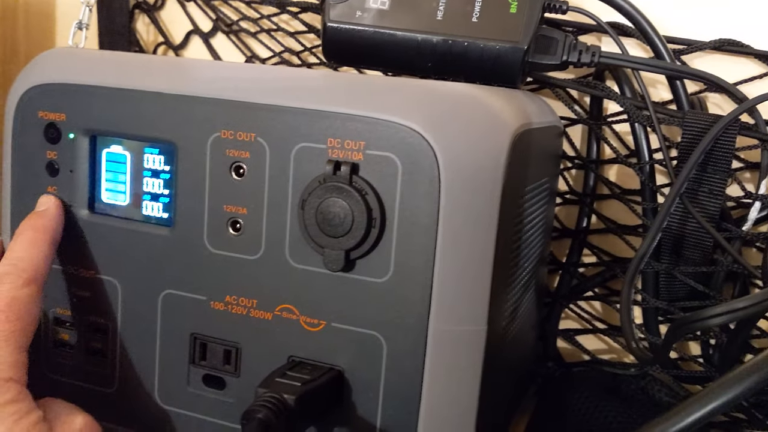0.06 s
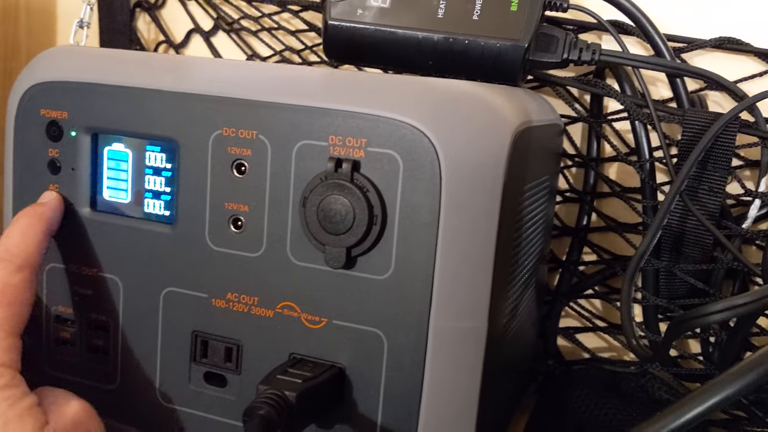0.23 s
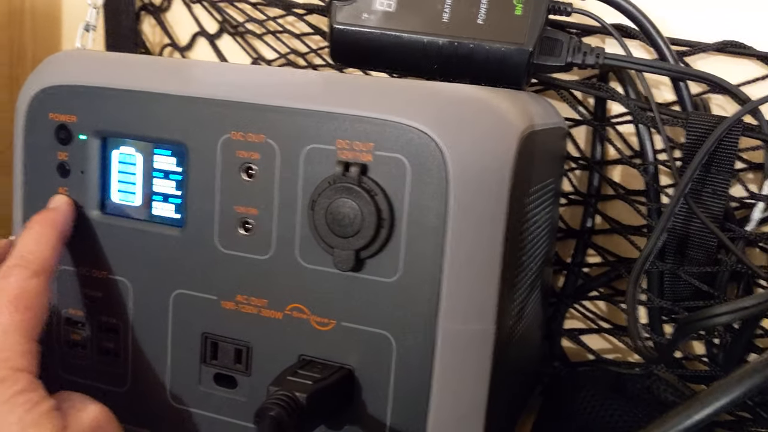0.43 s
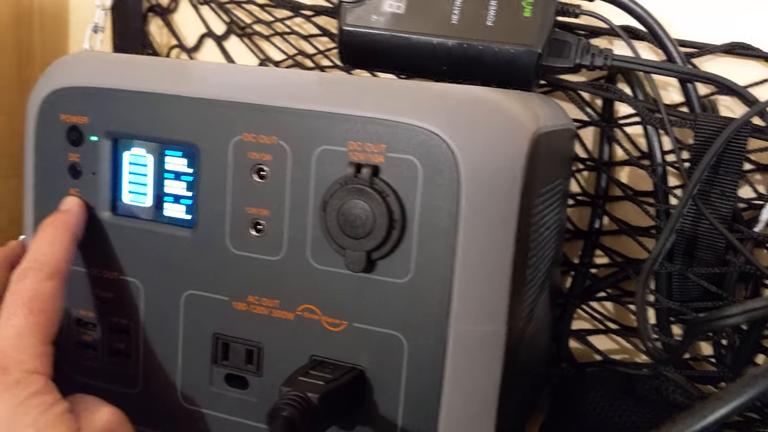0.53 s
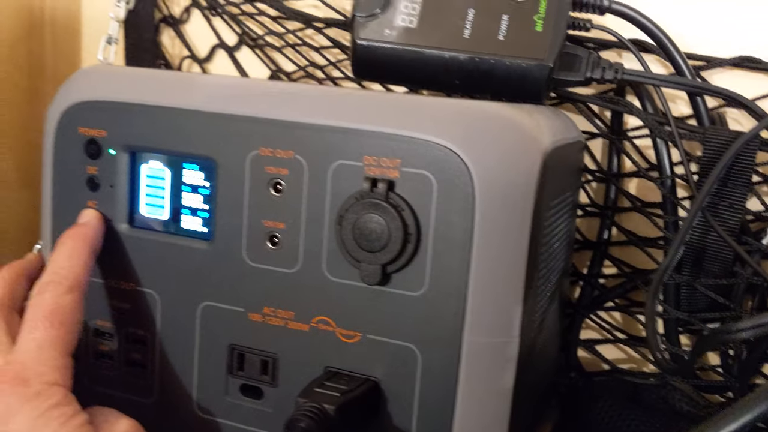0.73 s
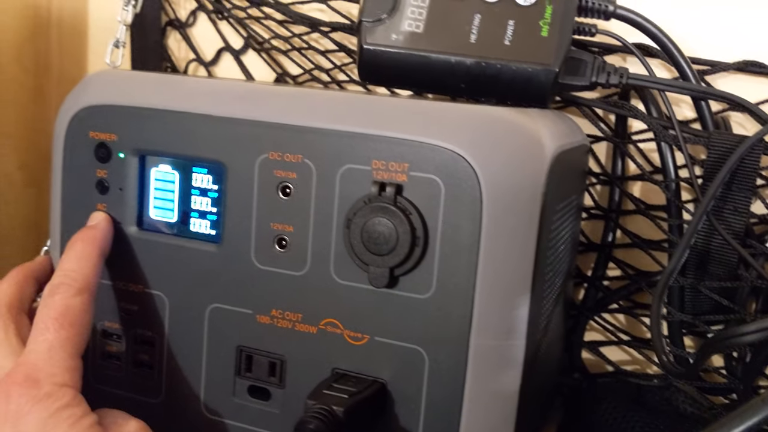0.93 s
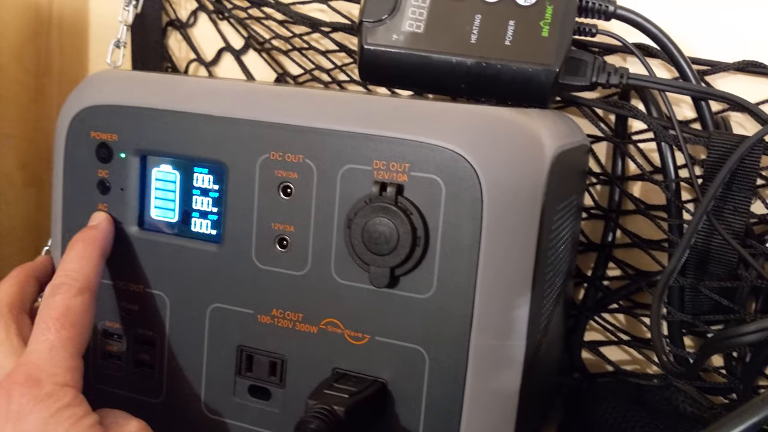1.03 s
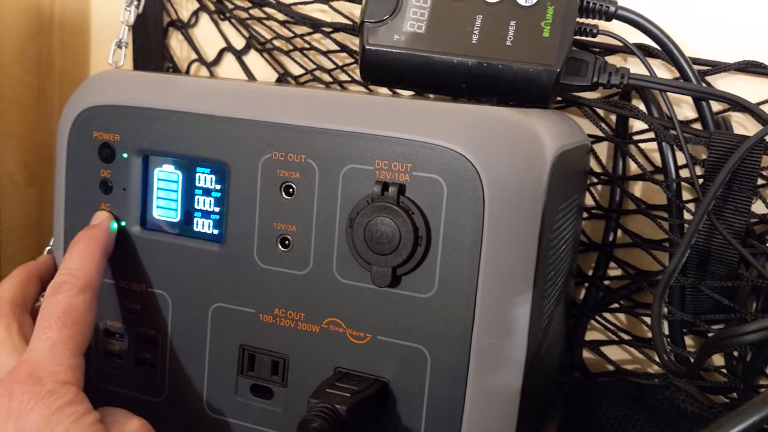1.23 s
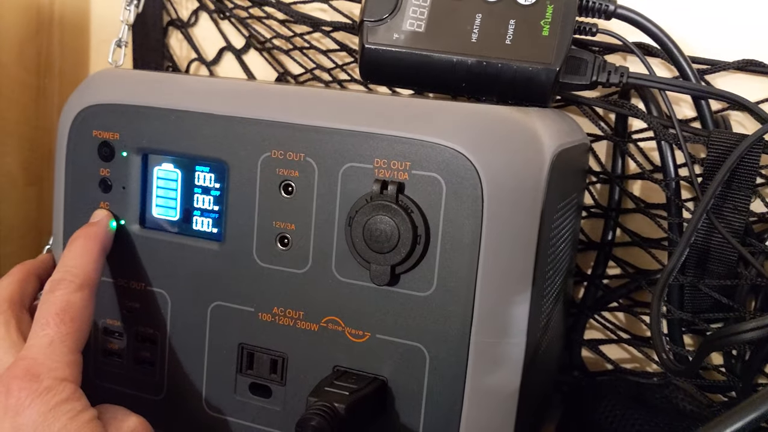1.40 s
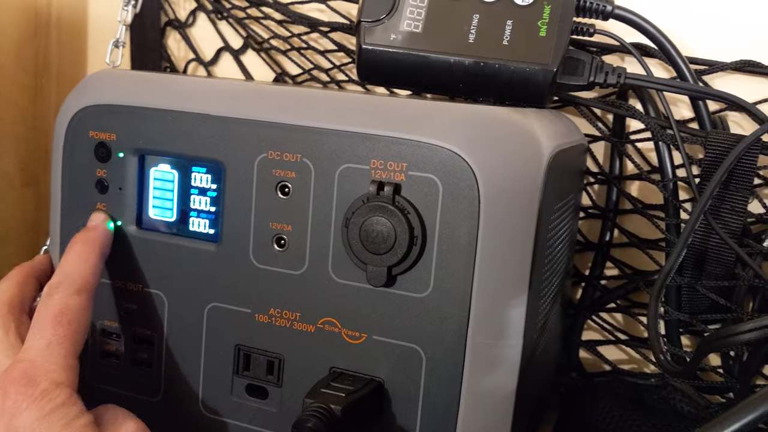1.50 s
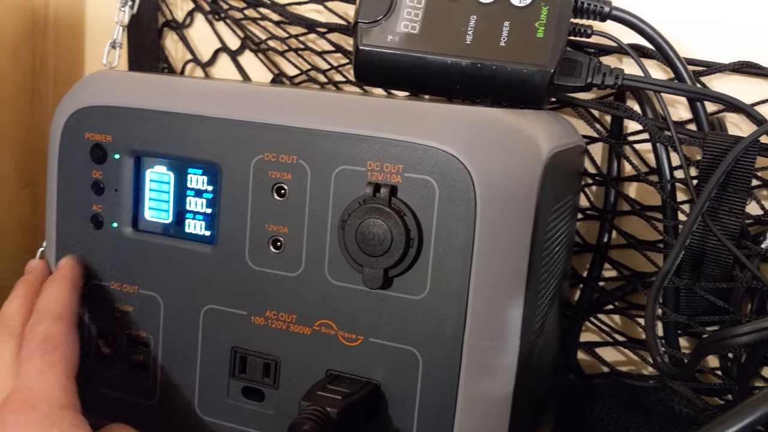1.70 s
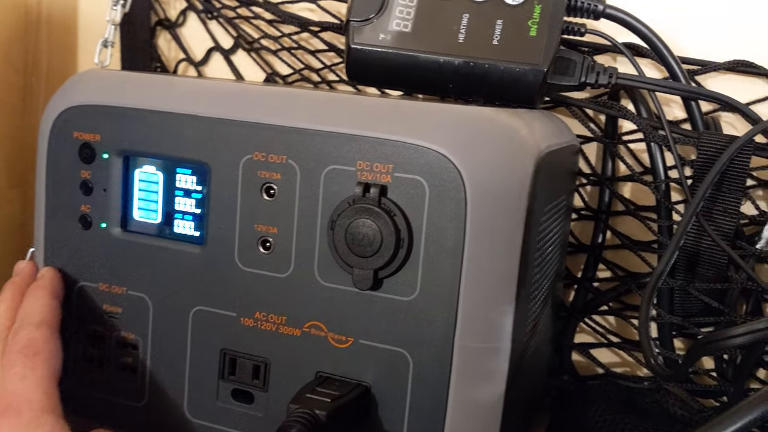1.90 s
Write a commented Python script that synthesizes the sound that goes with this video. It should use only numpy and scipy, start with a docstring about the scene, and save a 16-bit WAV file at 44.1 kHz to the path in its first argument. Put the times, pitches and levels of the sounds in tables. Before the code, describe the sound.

Sharp hard-plastic button clicks on a hollow case, with soft finger bumps over faint low hum

```python
"""Buttons of a portable power station

A finger works the buttons in a small trailer, close by. Each snap is a dense noise burst (the crack) with
damped panel modes; slower modes of the hollow case mostly build up later, as a low knock.
The hand bumps softly (low modes and noise ticks) and slides off the panel (a grainy noise swell).
Beneath lie wavering hum tones, narrow noise whirs, coloured room rumble and a hiss of changing level."""
import sys
import numpy as np
from scipy import signal
from scipy.fft import rfft, irfft
from scipy.io import wavfile
from scipy.ndimage import uniform_filter1d

SR = 44100
rng = np.random.default_rng(int(sys.argv[2]) if len(sys.argv) > 2 else 0)


def wrap_up_sound(samples):
    """Save the sound to the file named by the first command line argument, as 16-bit audio."""
    columns = np.atleast_2d(samples).T
    # keep every value between -1 and 1, then stretch to whole-number steps
    tamed = np.clip(columns, -1, 1)
    steps = np.round(tamed * 32767).astype(np.int16)
    wavfile.write(sys.argv[1], SR, steps)


N = 85995  # length of the scene in samples


def amp(db):
    """Logarithmic level: decibels to an amplitude gain."""
    return 10 ** (np.asarray(db) / 20)


def evened(x):
    """Normalization of power: scales to an rms of one."""
    return x / np.sqrt(np.mean(abs(x) ** 2) + 1e-20)


def read(points, hz):
    """Logarithmic pitch scale: interpolates a table along log frequency."""
    f, value = np.transpose(points)
    return np.interp(np.log(hz + 1), np.log(f + 1), value)


def spectrum(points):
    """Spectral envelope: a table as a function of frequency."""
    return lambda hz: read(points, hz)


def add(mix, s, sound):
    """Superposition: adds a stereo sound to the mix from time s on."""
    part = mix[:, round(s * SR):][:, :sound.shape[1]]
    part += sound[:, :part.shape[1]]


def sides(db):
    """Interaural level difference: left and right gains, left louder for positive dB."""
    return amp(np.array([[.5], [-.5]]) * db)


def noise(colour, size, likeness=0, pan_db=0):
    """Partially coherent stereo noise of rms one; colour gives dB at each frequency."""
    hz = np.fft.rfftfreq(size, 1 / SR)
    a, b = rfft(rng.standard_normal((2, size)))
    c = np.clip(likeness, -1, 1)  # correlation of left and right
    pair = np.array([a, c * a + np.sqrt(1 - c ** 2) * b])
    return evened(irfft(pair * amp(colour(hz)) * sides(pan_db), size))


def strike(t, rise, t60):
    """Transient response: an envelope of peak one that builds up and decays exponentially."""
    shape = (1 - np.exp(-t / rise)) ** 2 * amp(-60 * t / t60)
    return shape / shape.max()


def mode(t, hz, db, t60, rise, pan_db, lead, phase=0):
    """Damped normal mode, with a level and phase difference between the two microphones."""
    angle = 2 * np.pi * hz * t + phase + np.array([[.5], [-.5]]) * lead
    return amp(db) * sides(pan_db) * strike(t, rise, t60) * np.sin(angle)


def click(knock_db, ring_db, crack_db, mid_db, top_db):
    """Impact excitation: a snapping switch sets off crack, panel ring and case knock together."""
    crack_base_db = -36.5
    t = np.arange(SR // 4) / SR
    snap = amp(crack_base_db + crack_db) * crack(t, mid_db, top_db)
    return snap + amp(ring_db) * panel_ring(t) + amp(knock_db) * case_knock(t)


def crack(t, mid_db, top_db):
    """Dense reflections: tiny impacts on hard plastic merge into a dry, coloured noise burst."""
    # hard plastic: f/Hz, spectral level/dB per Hz, relative
    plastic = [(30, -50), (100, -42), (300, -1), (600, -7.5), (1200, 3), (2100, -1.5), (3000, 3.5),
               (4600, 4), (5700, -1), (8000, -1.5), (11000, -1), (14000, -4), (16000, -11)]
    # stereo balance: f/Hz, left-right level/dB
    balance = [(300, -6), (1500, 3.5), (2500, 5), (4500, -2.5), (6300, 0), (9000, -3.5), (12000, -8.5),
               (15000, 9)]
    # stereo coherence: f/Hz, left-right correlation
    coherence = [(300, 0.98), (900, -0.068), (1800, 0.39), (3000, -0.54), (4500, 1), (8000, 0.027),
                 (14000, -0.007)]
    rise_s, smooth_hz = .00027, 500
    # first instant, body, room: level/dB, t60/s
    decays = [(-6.5, .0033), (0, .048), (-27, .1)]

    hz = np.fft.rfftfreq(len(t), 1 / SR)
    fade = sum(amp(db) * strike(t, rise_s, t60) for db, t60 in decays)
    burst = rfft(fade * noise(np.zeros_like, len(t), likeness=read(coherence, hz)))
    # flatten the broad spectrum so that the colour alone shapes it
    burst = burst / np.sqrt(uniform_filter1d(abs(burst) ** 2, round(smooth_hz / hz[1])))
    tilt = [(1290, mid_db), (4000, 0), (8500, 0), (15000, top_db)]  # f/Hz, level/dB
    colour_db = read(plastic, hz) + read(tilt, hz)
    coloured = irfft(burst * amp(colour_db) * sides(read(balance, hz)), len(t))
    return evened(coloured) * (t < t[-1] / 2)


def panel_ring(t):
    """Plate resonance: the front panel rings in quickly rising modes of random phase."""
    # panel modes: f/Hz, level/dB before the click's ring gain, left-right level/dB, left phase lead/rad
    panel = [(1860, -30, -5, 2.6), (2390, -34, 6, -1.5), (2620, -29, 2, -2.2), (2800, -29, 0, -.5),
             (3290, -28, -3, -2.6), (3490, -30, -4, -1), (4134, -25, -9, -.7), (4473, -23.5, 3, -.5),
             (4660, -28, -9, -.2), (4910, -27, -7, -1.6), (5103, -32, 0, -.6)]
    rise_s, t60_s = .00061, .04
    ring = 0
    for f, db, pan_db, lead in panel:
        ring = ring + mode(t, f, db, t60_s, rise_s, pan_db, lead, rng.uniform(0, 2 * np.pi))
    return ring


def case_knock(t):
    """Cavity resonance: modes of the hollow case, mostly slower to build up than the panel."""
    # case modes: f/Hz, level/dB before the click's knock gain, t60/s, build-up/s, left phase lead/rad
    case = [(131.6, -42.5, .16, 0.0071, 0), (207.3, -30, 0.061, 0.0145, -.1),
            (226.2, -37, 0.13, 0.0074, 0.24), (397.5, -42, 0.0393, 0.0097, 0.21),
            (538, -33, 0.04, 0.017, 0.45), (743.7, -25.5, 0.033, 0.035, 0.88),
            (769, -29, 0.06, 0.0052, 0.51), (982, -41, 0.037, 0.012, 0.95),
            (1252, -35, 0.065, 0.00083, 1.42)]
    return sum(mode(t, f, db, t60, rise, 0, lead) for f, db, t60, rise, lead in case)


def bump(thud_db, tick_db):
    """Soft contact: a touch of the hand gives a dull ringing thud and a light noise tick."""
    # thud modes: f/Hz, level/dB before the thud gain, t60/s
    thud_modes = [(353.5, 1.5, 0.054), (580, -29, 0.052), (670, -6.5, 0.1), (902, -10.5, 0.057)]
    # dull noise of the thud: f/Hz, spectral level/dB per Hz, relative
    dull = [(100, -13), (350, 9), (900, 3), (1300, -15), (16000, -45)]
    # tick: f/Hz, spectral level/dB per Hz, relative
    tick_colour = [(200, -10), (900, -2), (1350, 4.5), (1800, -6.5), (2500, -4), (3300, -5.5), (5000, -22),
                   (16000, -27)]
    thud_rise_s, thud_t60_s, thud_noise_db = .002, .08, -5
    tick_rise_s, tick_t60_s = .0015, .06

    t = np.arange(SR // 4) / SR
    thud = sum(mode(t, f, db, t60, thud_rise_s, 0, 0) for f, db, t60 in thud_modes)
    rustle = strike(t, thud_rise_s, thud_t60_s) * noise(spectrum(dull), len(t), likeness=.91)
    thud = thud + amp(thud_noise_db) * rustle
    tick = strike(t, tick_rise_s, tick_t60_s) * noise(spectrum(tick_colour), len(t), likeness=.17)
    return amp(thud_db) * thud + amp(tick_db) * tick


def slide():
    """Friction noise: skin brushes over the plastic in one short, grainy swell."""
    # friction: f/Hz, spectral level/dB per Hz, relative
    friction = [(200, 7), (1000, -5), (3000, -4), (5000, -3), (8000, -8), (12000, -2.5), (16000, -3)]
    centre_s, width_s, level_db = 1.79, .042, -48
    grain_db, grain_s = 2, .0071  # rms of the level flutter, spacing of its random points

    t = np.arange(N) / SR
    swell = np.exp(-.5 * ((t - centre_s) / width_s) ** 2)
    grain = np.interp(t / grain_s, np.arange(N), rng.standard_normal(N))
    return amp(level_db + grain_db * grain) * swell * noise(spectrum(friction), N, likeness=.18)


def hum():
    """Amplitude modulation: low mains and fan tones waver and follow a slow level curve."""
    # tones: f/Hz, rms level/dB before waver and level curve
    tones = [(98.5, -58.5), (123.6, -60.5), (250, -71.5)]
    # level curve of all tones: t/s, gain/dB
    level_curve = [(0, -7), (.8, 2.5), (.97, 3.5), (1.25, 3), (1.6, -2.5), (1.75, 6.5), (1.95, 5)]
    waver_depth, waver_hz = .28, 4  # rms depth, width of the Gaussian low-pass

    t, hz = np.arange(N) / SR, np.fft.fftfreq(N, 1 / SR)
    out = np.zeros((2, N))
    for f, db in tones:
        slow = np.fft.fft(rng.standard_normal(N)) * np.exp(-(hz / waver_hz) ** 2)
        waver = 1 + waver_depth * evened(np.fft.ifft(slow).real)
        out += amp(db) * np.sqrt(2) * waver * np.sin(2 * np.pi * (f * t + rng.random()))
    return out * amp(np.interp(t, *np.transpose(level_curve)))


def whirs():
    """Resonance peaks in noise: faint whirs, each a narrow band."""
    # whirs: f/Hz, width/Hz, level/dB
    bands = [(477, 9.6, -77.5), (1436, 34, -69), (1872, 31, -70), (2237, 90, -74.5), (11700, 360, -95),
             (14700, 200, -71)]
    out = np.zeros((2, N))
    for f, width, db in bands:
        def peak(hz):
            """Resonance curve: level falls with distance from the centre."""
            return -20 * np.log10(1 + ((hz - f) / width) ** 2)
        out += amp(db) * noise(peak, N, likeness=.29)
    return out


def rumble():
    """Stationary noise: the steady room, coherent to a degree that varies with frequency."""
    # room: f/Hz, spectral level/dB per Hz, relative
    room = [(20, -20), (30, -13), (39, 4.5), (55, 0), (80, 2), (115, -5.5), (150, -0.5), (190, -6),
            (255, -11), (295, -20), (400, -21), (500, -17.5), (1000, -23), (1500, -22), (2000, -23.5),
            (3000, -24), (6000, -28), (9500, -29), (11800, -24.5), (16000, -35)]
    # stereo coherence: f/Hz, left-right correlation
    coherence = [(60, 0.96), (150, 0.34), (380, 0.74), (950, -0.32), (2380, -0.36), (5980, 0.041),
                 (15000, -0.16)]
    level_db, pan_db = -49, -2.8
    same = read(coherence, np.fft.rfftfreq(N, 1 / SR))
    return amp(level_db) * noise(spectrum(room), N, likeness=same, pan_db=pan_db)


def hiss():
    """Nonstationary noise: a thin hiss that swells and sinks."""
    # hiss: f/Hz, spectral level/dB per Hz, relative
    hiss_colour = [(300, -42), (1500, 1), (3000, -8), (5500, -10.5), (8500, -10), (11500, -4.5),
                   (16000, -8)]
    # swell of the hiss: t/s, level/dB
    hiss_curve = [(0, -78), (.45, -77), (.58, -61), (.82, -55.5), (1.0, -61), (1.2, -62.5), (1.36, -58.5),
                  (1.55, -64.5), (1.95, -57.5)]
    level_db = np.interp(np.arange(N) / SR, *np.transpose(hiss_curve))
    return amp(level_db) * noise(spectrum(hiss_colour), N, likeness=.11)


def scene():
    """Linear superposition: clicks and handling over the quiet trailer."""
    # button snaps: t/s, knock gain/dB, ring gain/dB, crack gain/dB, crack midrange/dB, crack top treble/dB
    clicks = [(.2120, -1.5, 0.5, 0.5, -1, -9), (1.638, -1.5, -5, -5, 6, 3.5),
              (1.6829, -26.5, -20, -13.5, 3, -6)]
    # soft bumps of the hand on the case: t/s, thud gain/dB, tick level/dB
    bumps = [(.51, -56, -62), (0.566, -67, -57), (1.115, -53, -49), (1.127, -48.5, -53), (1.184, -53, -53),
             (1.208, -56, -55)]
    mix = slide() + hum() + whirs() + rumble() + hiss()
    for s, *row in clicks:
        add(mix, s, click(*row))
    for s, *row in bumps:
        add(mix, s, bump(*row))
    return mix


def record(dry):
    """Band limitation: a linear-phase low-pass as the recorder's upper edge."""
    edge_hz = 16100
    low_pass = signal.firwin(255, edge_hz, window=("kaiser", 9), fs=SR)
    return signal.oaconvolve(dry, low_pass[None], "same")


dry = scene()
out = record(dry)
wrap_up_sound(out)
```